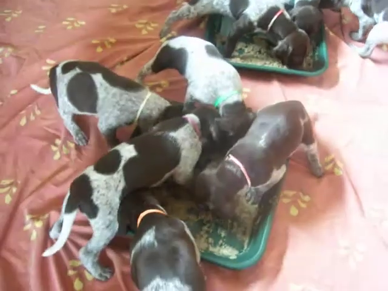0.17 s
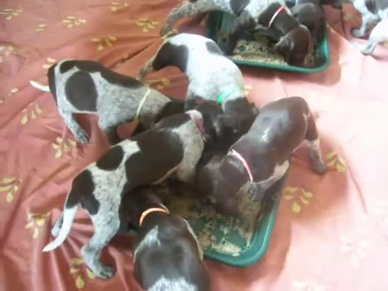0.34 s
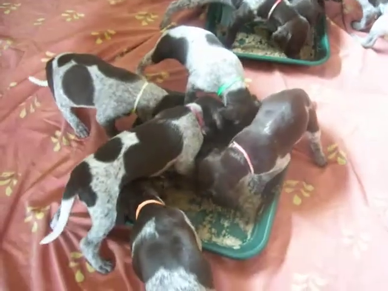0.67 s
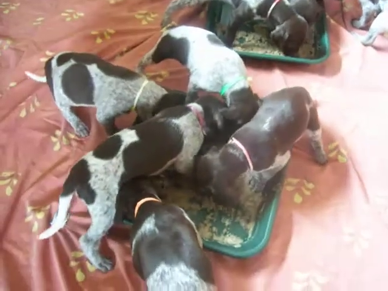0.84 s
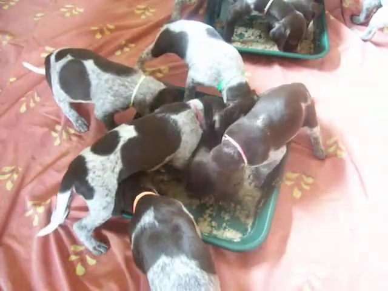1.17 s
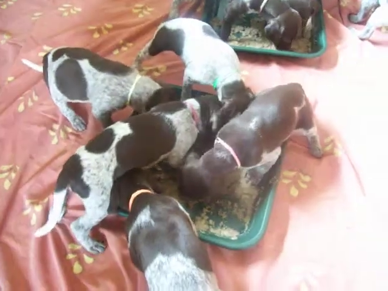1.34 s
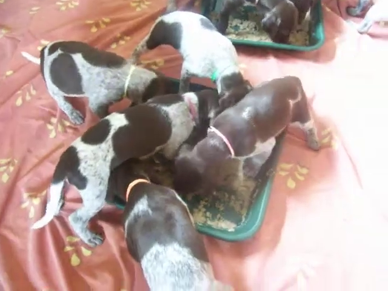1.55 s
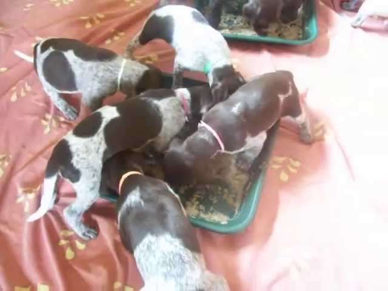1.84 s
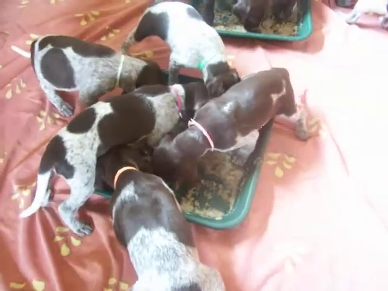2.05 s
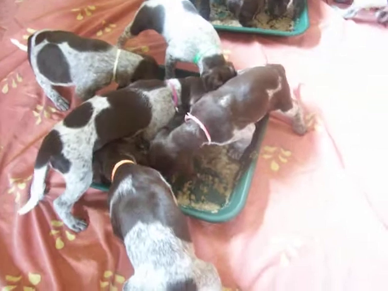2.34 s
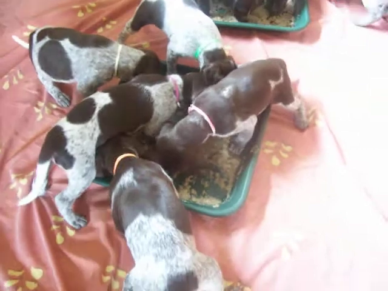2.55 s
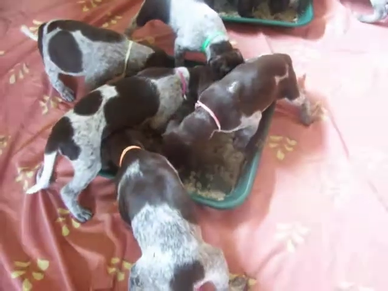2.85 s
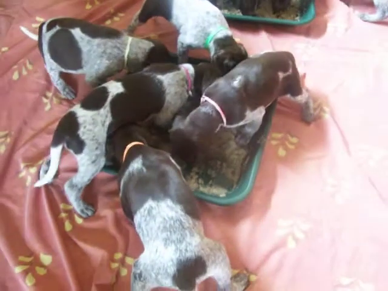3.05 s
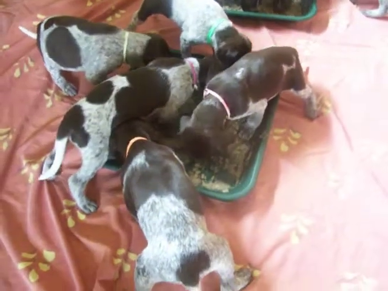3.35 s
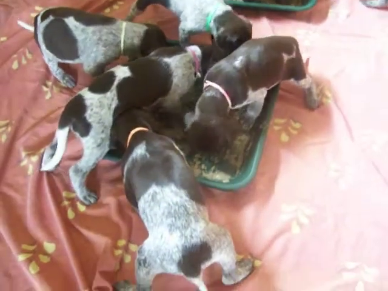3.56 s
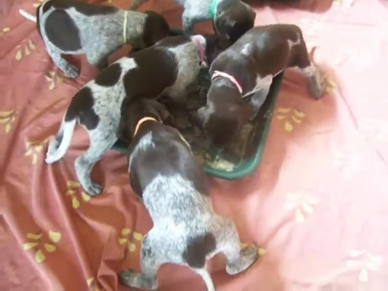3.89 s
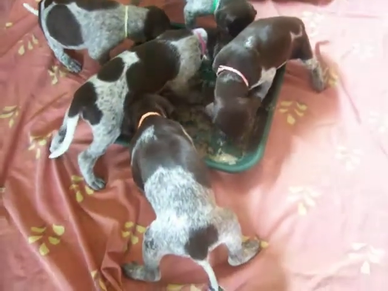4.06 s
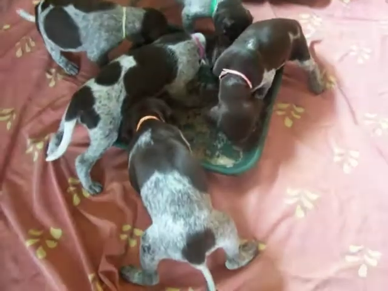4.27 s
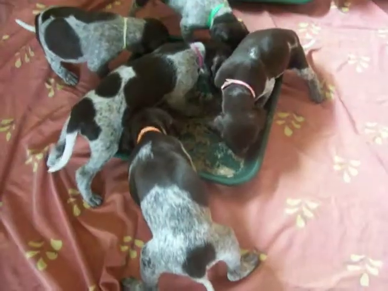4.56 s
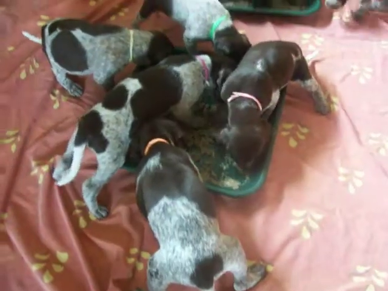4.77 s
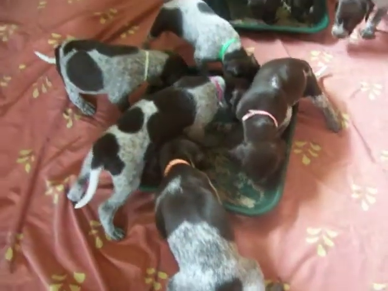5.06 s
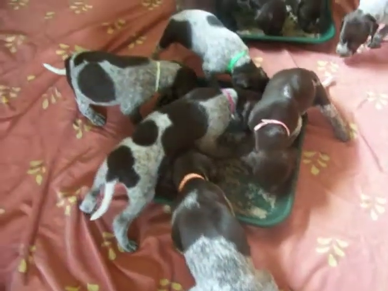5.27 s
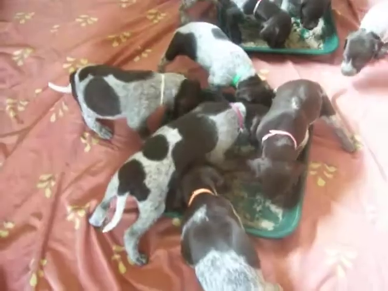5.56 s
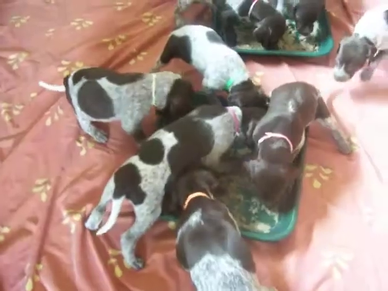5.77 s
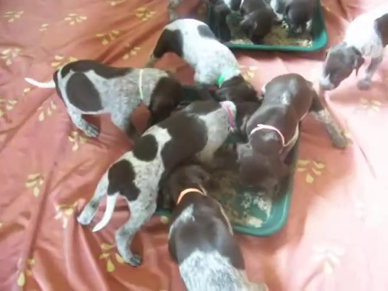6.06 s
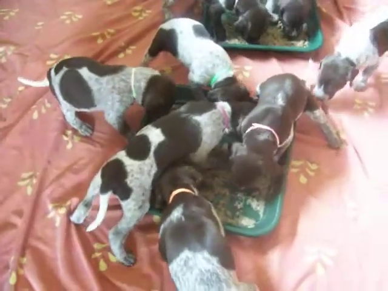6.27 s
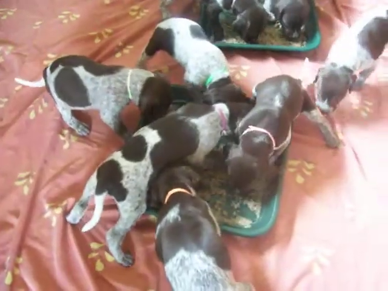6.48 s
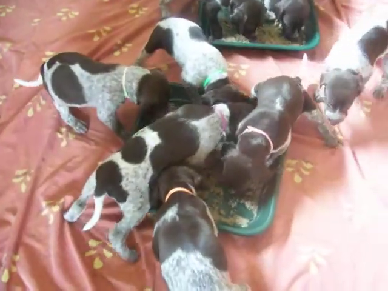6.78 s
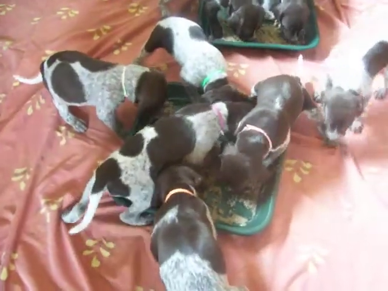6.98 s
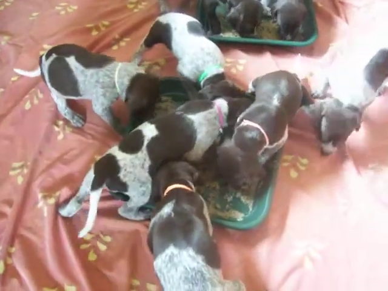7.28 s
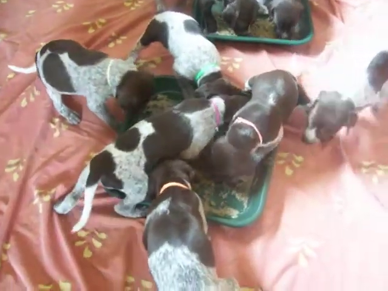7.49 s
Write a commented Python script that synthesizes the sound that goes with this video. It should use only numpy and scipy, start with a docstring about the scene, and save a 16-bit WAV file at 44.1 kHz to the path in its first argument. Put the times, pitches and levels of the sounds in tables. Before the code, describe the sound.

Several puppies lap and smack wetly at mash in plastic trays indoors, with quick slurps and a few tiny whimpers over faint hiss and hum.

```python
"""Puppies at their mash

A litter of puppies eats wet mash from plastic trays in a small room. Snapping saliva films ring the mouth,
turbulent suction slurps, and crowds of tiny wet pops make the squelching; slips ring the scraped tray.
A pup gives short whimpers: gliding harmonics and a rasp, filtered by its throat.
Under it lie a soft hiss, a mains hum, soft bumps and a low sine drone that swells towards the end."""
import sys
import numpy as np
from scipy import signal
from scipy.fft import rfft, irfft, next_fast_len
from scipy.io import wavfile

SR = 44100
rng = np.random.default_rng(int(sys.argv[2]) if len(sys.argv) > 2 else 0)


def wav_record(signal):
    """Record a signal, one row per channel, as 16-bit PCM in the file named by sys.argv[1]."""
    frames = np.transpose(np.atleast_2d(signal))
    bounded = np.clip(frames, -1, 1)
    # unit amplitude maps onto the largest positive 16-bit level
    quanta = np.round(bounded * 32767).astype(np.int16)
    wavfile.write(sys.argv[1], SR, quanta)


N = 336924  # samples


def smacks(rows, tray_echo_db=-11, snap_db=-10, snap_hz=4200, snap_width_hz=5000,
           threads_per_s=1800, threads_s=0.0079, size=1400):
    """Impulse response of a cavity: a snapping film of saliva rings the mouth; its threads break just after."""
    out, t = np.zeros(N), np.arange(size) / SR
    for s, db, hz, width_hz, threads_db in rows:
        breaks = (rng.random(size) < threads_per_s / SR) * rng.standard_normal(size)
        threads = breaks * np.exp(-t / threads_s)
        # all the threads together have the energy of one unit click
        clicks = from_db(threads_db) * rms_one(threads * (t > .0008)) / np.sqrt(size)
        clicks[0] = 1
        # each muzzle has its own distance from the tray
        echo_s = rng.uniform(.0015, .003)
        clicks[int(echo_s * SR)] += from_db(tray_echo_db)
        mouth = rms_one(ring(clicks, hz, width_hz))
        snap = rms_one(ring(clicks, snap_hz, snap_width_hz))
        pop = rms_one(mouth + from_db(snap_db) * snap)
        # the level is that of the whole energy spread over 10 ms
        add(out, s, from_db(db) * pop * np.sqrt(.01 * SR / size))
    return out


def faint_smacks(lap, count=28):
    """Inverse-transform sampling: fainter smacks fall at random, mostly where the mouths are busy."""
    level_db, spread_db, threads_db = -44.5, -1, -1.5
    middle_hz, spread_oct, width_hz = 4230, 0.41, 1700
    chance = np.cumsum(lap) / np.sum(lap)
    times = np.interp(rng.random(count), chance, clock())
    rows = []
    for s, (loud, high) in zip(times, rng.standard_normal((count, 2))):
        hz = middle_hz * 2 ** (spread_oct * high)
        rows.append((s, level_db + spread_db * loud, hz, width_hz, threads_db))
    return rows


def mouthfuls():
    """Common modulation: the same mouthfuls drive the effort of lapping and of chewing."""
    # mouthfuls: middle t/s, length/s, lapping effort/dB, chewing effort/dB
    bites = [(.14, 0.46, -48, -53.5), (0.495, .2, -42.5, -47), (0.779, 0.093, -39.5, -45.5),
             (1.069, .17, -46, -56.5), (1.333, .13, -37.5, -46), (1.721, .13, -41.5, -45),
             (1.87, .1, -48.5, -58), (2.016, 0.13, -41.5, -47), (2.369, .11, -44.5, -48),
             (2.629, .1, -42.5, -50), (2.741, .13, -42.5, -46.5), (3.137, .16, -46.5, -51.5),
             (3.327, .15, -42.5, -58), (3.843, 0.18, -49.5, -50.5), (4.141, .09, -45.5, -45.5),
             (4.277, .17, -40.5, -46.5), (4.521, .11, -37, -42.5), (4.639, .12, -41, -44),
             (4.895, .17, -45.5, -50), (5.205, .14, -47, -51), (5.39, .07, -47, -53),
             (5.715, .14, -47, -47.5), (6.021, 0.084, -49, -68), (6.335, 0.13, -45, -51),
             (6.798, .08, -45.5, -48.5), (7.055, .18, -46, -48.5), (7.41, .22, -44.5, -47),
             (7.612, 0.089, -43.5, -60)]
    # the lull is the rest of the litter, between mouthfuls
    lap = effort([(s, length_s, db) for s, length_s, db, _ in bites], lull_db=-53.5)
    chew = effort([(s, length_s, db) for s, length_s, _, db in bites], lull_db=-58)
    return lap, chew


def slurps(lap, chew, ring_width_hz=380, ring_db=0, size=20000):
    """Turbulent suction: mash and air rush through the lips as dense fizz over the hollow's resonances."""
    # sudden slurps: t/s, fade/s, wet fizz level/dB, hollow level/dB, strongest resonance f/Hz
    sudden = [(.5, 0.008, -39, -40.5, 2130), (1.295, 0.059, -64, -48, 2020), (3.035, 0.019, -36, -44, 2160),
              (3.624, 0.0095, -29.5, -64, 5450), (4.205, 0.018, -42, -39, 650),
              (4.886, 0.018, -62, -41, 910), (5.044, 0.034, -32.5, -43.5, 758),
              (5.474, 0.038, -48, -42, 2230), (6.115, 0.016, -44, -51.5, 553),
              (6.176, 0.025, -51, -40, 1090), (6.227, 0.024, -36, -41.5, 6500),
              (6.397, 0.014, -55, -38.5, 2090), (6.459, 0.047, -58, -46.5, 1760),
              (6.717, 0.021, -58.5, -42.5, 1190), (6.767, 0.011, -45, -54, 1196),
              (7.088, 0.015, -43, -44.5, 2230)]
    # resonances of mouth and tray: f/Hz, width/Hz, level/dB
    hollow_modes = [(710, 55, -7.5), (1158, 110, 1.5), (1406, 360, 2), (2230, 140, 8)]
    # spectrum of the wet fizz: f/Hz, level/dB
    fizz_spectrum = [(800, -13), (2000, -24.5), (3200, 0.5), (4200, -2.5), (5300, -0.5), (6600, 7),
                     (7500, -3.5), (9000, -10)]
    # suction levels at a full mouth; growth is dB of suction per dB of effort
    full_mouth_db, suck_fizz_db, suck_hollow_db, growth = -37, -46, -53.5, 1.04
    t = np.arange(size) / SR
    spray = grains(per_s=7000, spread_db=4.0)
    fizz = colour(spray, fizz_spectrum)
    hollow = modal_body(spray, hollow_modes)
    out = from_db(suck_fizz_db) * fizz * (lap / from_db(full_mouth_db)) ** growth
    out += from_db(suck_hollow_db) * hollow * (chew / from_db(full_mouth_db)) ** growth
    for s, fade_s, fizz_db, hollow_db, hz in sudden:
        at = slice(int(s * SR), int(s * SR) + size)
        suck = stroke(t, swell_s=0.0032, fade_s=fade_s)
        strongest = rms_one(ring(spray[at], hz, ring_width_hz))
        mouth = rms_one(hollow[at] + from_db(ring_db) * strongest)
        add(out, s, suck * (from_db(fizz_db) * fizz[at] + from_db(hollow_db) * mouth))
    return out


def litter(lap, chew, lap_db=-4.5, chew_db=-4.5, clump_db=2.5, clumps_per_s=22):
    """Superposed random pops, in uneven clumps: bright lapping, duller chewing, muzzles shoving the mash."""
    # muzzles pushing through the mash: middle t/s, length/s, level/dB
    shoves = [(.25, 0.18, -54.5), (.72, 0.09, -54), (1.8, 0.44, -55.5), (4.53, 0.42, -54.5),
              (5.22, 0.11, -61), (5.65, .15, -54.5), (6.35, 0.23, -59), (7.0, 0.17, -54.5),
              (7.38, 0.2, -58)]
    lapping = from_db(lap_db) * lap * squelch(3650, 8210, per_s=1600, spread_db=6.5, sharpness=5.3)
    chewing = from_db(chew_db) * chew * squelch(1490, 3060, per_s=1000, spread_db=5.5, sharpness=3.44)
    mash = squelch(297.3, 1428, per_s=700, spread_db=4.0, sharpness=3.53)
    nuzzling = effort(shoves, lull_db=-60.5) * mash
    return (lapping + chewing + nuzzling) * from_db(clump_db * drift(clumps_per_s))


def squelch(low_hz, high_hz, per_s, spread_db, sharpness, count=14):
    """Damped oscillation: each little wet pop rings a few cycles at one of several pitches."""
    clicks, dealt = grains(per_s, spread_db), rng.integers(0, count, N)
    pops = np.zeros(N)
    for k, hz in enumerate(np.geomspace(low_hz, high_hz, count)):
        pops += ring(clicks * (dealt == k), hz, hz / sharpness) / np.sqrt(hz)
    return rms_one(pops)


def tray():
    """Stick-slip friction: a paw or muzzle rubs the tray, and dense tiny slips ring its modes."""
    # shoves and scrapes: t/s, swell/s, fade/s, level/dB
    scrapes = [(4.207, .005, 0.035, -39.5), (4.48, .12, 0.092, -44.5)]
    # modes of the plastic body: f/Hz, width/Hz, level/dB
    plastic_modes = [(784, 74, -1), (1510, 74, 2), (2230, 88, -1), (3400, 190, -9.5)]
    slips = grains(per_s=3600, spread_db=2.5)
    rubbing = sum(from_db(db) * stroke(clock() - s, swell_s, fade_s) for s, swell_s, fade_s, db in scrapes)
    return modal_body(slips, plastic_modes) * rubbing


def whimpers(jitter=0.025, shimmer_db=2.1, order=5):
    """Source-filter voice: gliding harmonics and a rasp that pulses with them, shaped by the throat."""
    # t/s, length/s, level/dB, first pitch f/Hz, last pitch f/Hz,
    # middle of the slide [share of length], overtones/dB, rasp/dB
    squeaks = [(1.176, 0.065, -41, 407, 394.5, 0.49, -4.5, -8),
               (2.155, 0.03, -43.5, 730, 495, 0.33, -8.5, -14),
               (2.338, 0.071, -37, 529.5, 424, .7, -5.5, -15),
               (2.582, 0.065, -32, 578.4, 811, 0.47, 2.5, -19),
               (2.679, 0.034, -32.5, 789, 675, 0.475, -2, -20),
               (2.771, 0.021, -48, 765, 715, 0.46, 8, -2.5),
               (3.222, .084, -33.5, 522.5, 809, 0.47, -0.5, -22),
               (3.319, 0.074, -40.5, 1202, 838, 0.37, -4, -13),
               (7.532, 0.028, -37, 564, 512, 0.42, -34, -14)]
    # a pup's throat: f/Hz, gain/dB
    throat = [(380, 0.5), (520, 3), (760, 6.5), (1100, -1), (1550, -7.5), (2100, -17.5), (4000, -75.5)]
    glide_span, peak_at = 0.187, 0.58  # shares of the length
    edge_db = -21.5  # level at both ends against the peak
    out, waver, flutter = np.zeros(N), drift(300), drift(150)
    air = colour(rng.standard_normal(N), [(150, -51)] + list(throat) + [(9000, -42.5)])
    k = np.arange(1, order + 1)[:, None]  # harmonic numbers
    for s, length_s, db, first_hz, last_hz, middle, overtones_db, rasp_db in squeaks:
        at = np.arange(int(s * SR), min(int((s + length_s) * SR), N))
        along = np.linspace(0, 1, len(at))
        # the pitch slides in an S
        glide = (1 + np.tanh((along - middle) / glide_span)) / 2
        hz = (first_hz + (last_hz - first_hz) * glide) * (1 + jitter * waver[at])
        phase = 2 * np.pi * np.cumsum(hz) / SR
        weights = gain_at(throat, k * hz) * from_db(overtones_db * (k > 1))
        harmonics = np.sum(weights * np.sin(k * phase), axis=0)
        voice = harmonics / np.sqrt(np.sum(weights ** 2, axis=0) / 2)
        rasp = from_db(rasp_db) * air[at] * (1 + .5 * np.cos(phase))
        arch_db = edge_db * np.interp(along, [0, peak_at, 1], [1, 0, 1]) ** 2
        out[at] += (voice + rasp) * from_db(db + arch_db + shimmer_db * flutter[at])
    return out


def wall_echo(x, delay_s=.012, echo_db=-8):
    """Interference: a gliding squeak beats against its own echo from a near wall."""
    return x + from_db(echo_db) * np.interp(clock() - delay_s, clock(), x)


def room(x, wet_db, treble_loss_hz=8000, build_s=0.00096, t60_s=0.58):
    """Reverberation: the direct sound and a diffuse tail that builds up and decays exponentially."""
    t = np.arange(SR // 2) / SR
    tail = rng.standard_normal(len(t)) * from_db(-60 * t / t60_s) * (1 - np.exp(-(t / build_s) ** 2))
    dull = np.exp(-2 * np.pi * treble_loss_hz / SR)
    response = from_db(wet_db) * signal.lfilter([1 - dull], [1, -dull], tail / np.linalg.norm(tail))
    return x + signal.fftconvolve(x, response)[:N]


def background():
    """Stationary noise and tones: hiss and rumble, wavering hums, a drone and two soft bumps."""
    # spectrum of hiss and rumble: f/Hz, level/dB
    quiet_spectrum = [(12, -27), (20, 7.5), (51, 2), (226, -9.5), (292, -7), (439, -42.5), (486, -13.5),
                      (596, -21.5), (852, -11), (1320, -30), (1930, -11.5), (2690, -28), (6400, -14),
                      (7460, -23), (8920, -26), (11600, -64.5), (19600, -120)]
    # steady-pitched hums: f/Hz, level/dB
    hum_tones = [(29.8, -56.5), (120, -69.5)]
    # course of the low drone: t/s, f/Hz, level/dB
    drone_course = [(0, 91, -70), (3, 90, -66.5), (3.6, 90, -56), (4.4, 89, -65.5), (5.9, 89, -62),
                    (6.5, 87.5, -54.5), (7.3, 86.5, -47), (7.64, 86, -44.5)]
    # soft low bumps: middle t/s, half length/s, level/dB
    soft_bumps = [(3.932, 0.015, -44), (7.412, 0.099, -48)]
    bump_spectrum = [(10, -20.0), (30, 6), (90, -4.5), (250, -13.5), (1500, -36)]  # f/Hz, level/dB
    t = clock()
    quiet = from_db(-52.5) * colour(rng.standard_normal(N), quiet_spectrum)
    hums = sum(from_db(db + 0.83 * drift(9)) * np.sin(2 * np.pi * hz * t) for hz, db in hum_tones)
    drone_hz, drone_db = in_time(drone_course)
    drone = from_db(drone_db + 1.2 * drift(24)) * np.sin(2 * np.pi * np.cumsum(drone_hz) / SR)
    swell = sum(from_db(db) * np.exp(-((t - s) / half_s) ** 2) for s, half_s, db in soft_bumps)
    bumps = swell * colour(rng.standard_normal(N), bump_spectrum)
    return quiet + np.sqrt(2) * (hums + drone) + bumps  # root 2: the tones' levels are rms


def effort(rows, lull_db):
    """Addition of powers: each bout (middle s, length s, dB) swells and ebbs in a bell above the lull."""
    t = clock()
    power = from_db(lull_db) ** 2
    for s, length_s, db in rows:
        bell = np.exp(-2 * np.minimum((2 * (t - s) / length_s) ** 2, 20))
        power = power + from_db(db) ** 2 * bell
    return np.sqrt(power)


def stroke(t, swell_s, fade_s):
    """Envelope of a driven, then damped motion: a straight rise and an exponential fall."""
    return np.clip(t / swell_s, 0, 1) * np.exp(-np.maximum(t - swell_s, 0) / fade_s)


def grains(per_s, spread_db):
    """Shot noise: random tiny clicks of uneven size and either sign."""
    sizes = from_db(spread_db * np.minimum(rng.exponential(1, N), 4))
    return (rng.random(N) < per_s / SR) * sizes * rng.choice([-1, 1], N)


def resonate(x, hz, width_hz):
    """Resonance of one damped mode, with gain of about 1 at its peak."""
    r = np.exp(-np.pi * width_hz / SR)
    feedback = [1, -2 * r * np.cos(2 * np.pi * hz / SR), r * r]
    return signal.lfilter(np.array([1, 0, -1]) * (1 - r * r) / 2, feedback, x + 1e-18)


def ring(x, hz, width_hz):
    """Cascaded resonance: two passes give a rounded attack and steep skirts."""
    return resonate(resonate(x, hz, width_hz), hz, width_hz)


def modal_body(x, modes):
    """Modal superposition: parallel resonances (Hz, width Hz, dB), scaled to unit power."""
    return rms_one(sum(from_db(db) * resonate(x, hz, width_hz) for hz, width_hz, db in modes))


def gain_at(points, hz):
    """Frequency response: read a spectrum on a log-frequency axis, as gain."""
    f, db = np.transpose(points)
    return from_db(np.interp(np.log(hz + 1), np.log(f), db))


def shape(x, points):
    """Linear filtering: multiply a sound's Fourier transform by a spectrum."""
    size = next_fast_len(N + SR // 10)
    return irfft(rfft(x, size) * gain_at(points, np.fft.rfftfreq(size, 1 / SR)), size)[:N]


def colour(x, points):
    """Spectral shaping: filter a sound by a spectrum and scale it to unit power."""
    return rms_one(shape(x, points))


def drift(rate):
    """Slow random modulation: normal knots of unit spread, rate per second, joined by straight lines."""
    knots = rng.standard_normal(int(N / SR * rate) + 2)
    return np.interp(clock() * rate, np.arange(len(knots)), knots)


def in_time(rows):
    """Linear interpolation: curve rows, time first, joined by straight lines."""
    s, *columns = np.transpose(rows)
    return [np.interp(clock(), s, c) for c in columns]


def from_db(db):
    """Logarithmic level: decibels to amplitude gain."""
    return 10 ** (np.asarray(db) / 20)


def rms_one(x):
    """Mean-square normalisation: scale to unit power."""
    return x / np.sqrt(np.mean(x ** 2) + 1e-20)


def clock():
    """Uniform sampling: the time of every sample in seconds."""
    return np.arange(N) / SR


def add(out, s, sound):
    """Superposition: mix a short sound in at time s."""
    i = max(int(s * SR), 0)
    out[i:i + len(sound)] += sound[:N - i]


def scene():
    """Superposition of the feeding litter and the squeaks, both reverberant, over the background."""
    # loudest smacks of tongues and lips: t/s, level over 10 ms/dB, mouth resonance f/Hz, its width/Hz,
    # breaking threads against the first snap/dB
    loud_smacks = [(.047, -42, 3600, 1100, -17), (.1445, -41.5, 4400, 1810, -3.5),
                   (.1652, -40.5, 3900, 1110, 5), (.3895, -40.5, 2070, 1100, 7),
                   (.412, -38, 3780, 1410, -1), (.4699, -40.5, 4700, 3700, 5), (.4883, -43, 5630, 3320, -6),
                   (.5035, -31, 3940, 4550, -5), (.5055, -32.5, 6760, 1400, -22),
                   (.562, -40.5, 3720, 1800, -8), (.7965, -41.5, 2850, 1100, -12),
                   (.9574, -41.5, 3380, 1730, 6), (1.0976, -44, 6500, 3000, 3),
                   (1.3128, -34.5, 4300, 1113, 3), (1.3562, -35, 6940, 1100, -13),
                   (1.3744, -48, 6140, 4500, -2), (1.559, -39.5, 6450, 1090, 1),
                   (1.6547, -44, 3640, 2200, 4), (1.6794, -41.5, 6200, 2800, -1),
                   (1.9138, -40.5, 4300, 1100, -8), (1.9603, -37, 3100, 1100, -8),
                   (2.037, -41.5, 3250, 3700, -3), (2.2904, -41, 2520, 4400, 6),
                   (2.6974, -38.5, 1960, 2600, 8), (2.7338, -36, 3520, 2420, -8.5),
                   (2.874, -37.5, 4940, 2420, 13), (3.0383, -35.5, 3190, 1310, -7),
                   (3.2413, -42, 6300, 4580, 6), (3.324, -41.5, 5900, 1100, -1),
                   (3.5707, -43, 6450, 2200, 2), (3.6277, -32, 5930, 1920, -18),
                   (3.782, -42, 4170, 1800, -11), (3.8905, -41, 6370, 1100, 4),
                   (4.0669, -47, 3700, 1100, -11), (4.1483, -41, 3780, 1100, -25),
                   (4.2072, -40.5, 4860, 2100, -5), (4.2762, -40, 3440, 1100, 0),
                   (4.306, -39, 3980, 1100, -19), (4.5982, -38, 4220, 1090, -17),
                   (4.803, -41, 3600, 1310, -9), (4.8353, -40.5, 7050, 1100, 13),
                   (4.912, -44, 4300, 2800, -8), (4.9568, -38, 3560, 1110, -13),
                   (5.0455, -47, 6250, 1800, -8), (5.3584, -36, 3050, 2000, -26),
                   (5.4794, -37.5, 1914, 2600, 13), (5.7744, -42, 4260, 2500, 0),
                   (5.9296, -41.5, 5260, 3600, 14), (5.9522, -43.5, 1820, 1100, 0),
                   (5.9875, -41.5, 1940, 1100, 8), (6.2276, -35, 4140, 1100, -25),
                   (6.2475, -37, 2050, 1100, 4), (6.4, -43, 2230, 1090, -15),
                   (6.4186, -44.5, 4330, 1100, -6), (6.6551, -38, 3660, 1100, -6),
                   (6.7172, -30, 5200, 2370, -21), (6.7672, -38, 2640, 3170, -14),
                   (6.8121, -41, 3060, 1100, -2), (7.0952, -38, 2060, 1110, -3),
                   (7.1644, -40, 7100, 1900, -4.5), (7.229, -38.5, 4200, 1100, -9),
                   (7.4165, -38, 3970, 1090, 7), (7.4522, -37, 6670, 2000, -7),
                   (7.4718, -38, 4360, 1110, -8)]
    lap, chew = mouthfuls()
    smacking = room(smacks(list(loud_smacks) + faint_smacks(lap)), wet_db=-7.0)
    eating = room(slurps(lap, chew) + litter(lap, chew) + tray(), wet_db=-4)
    squeaks = room(wall_echo(whimpers()), wet_db=-3.5)
    return (smacking + eating + squeaks + background())[None]


def record(dry):
    """Band limitation: a microphone that rolls off the treble, then a steep elliptic low-pass."""
    # the microphone's treble: f/Hz, gain/dB
    treble = [(6900, 1.5), (7500, 3.5), (8100, -7), (8600, -9), (9200, -33)]
    cutoff_hz = 9076
    low_pass = signal.ellip(8, .2, 60, cutoff_hz, fs=SR, output="sos")
    return signal.sosfilt(low_pass, shape(dry[0], treble))[None]


dry = scene()
out = record(dry)
wav_record(out)
```